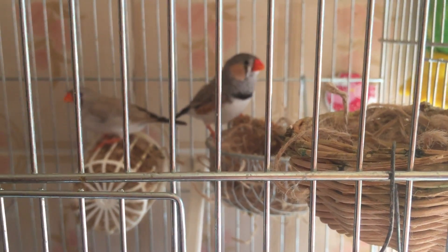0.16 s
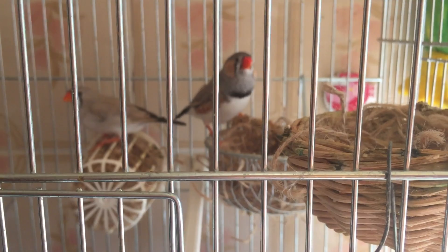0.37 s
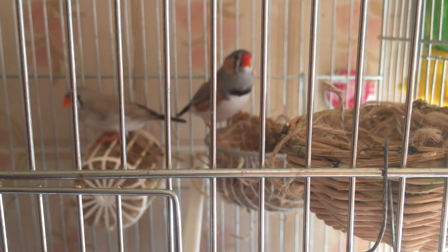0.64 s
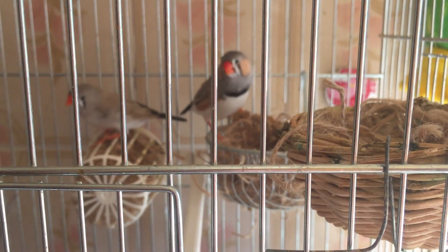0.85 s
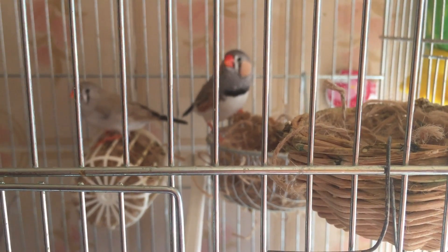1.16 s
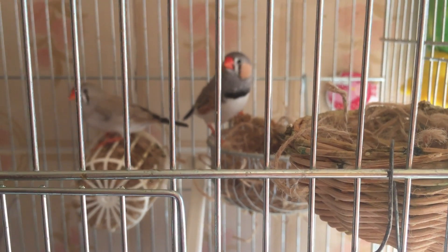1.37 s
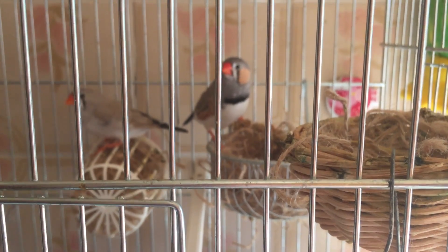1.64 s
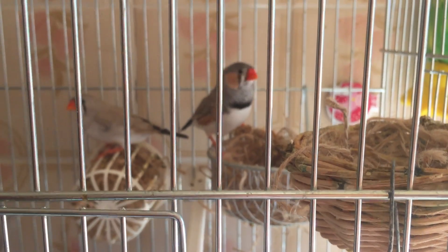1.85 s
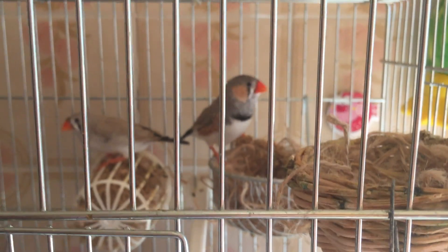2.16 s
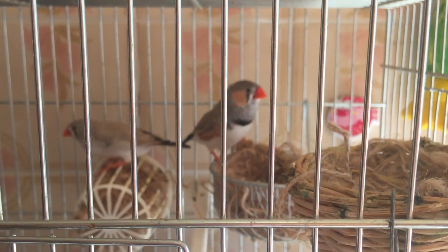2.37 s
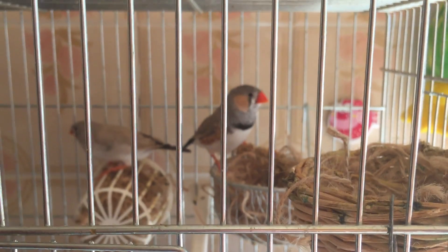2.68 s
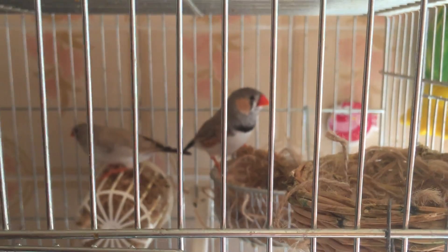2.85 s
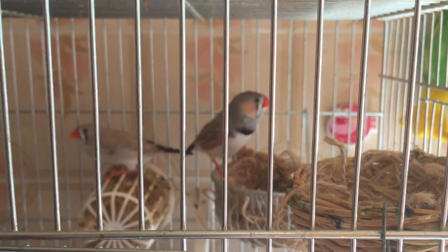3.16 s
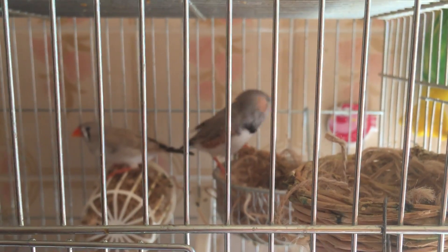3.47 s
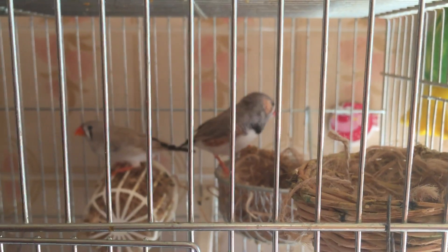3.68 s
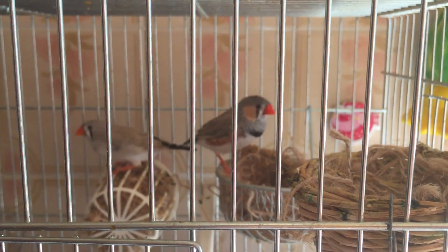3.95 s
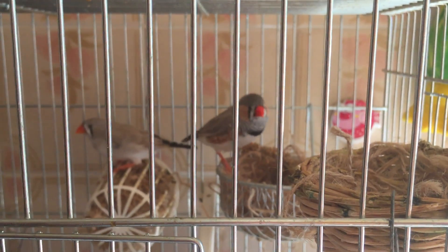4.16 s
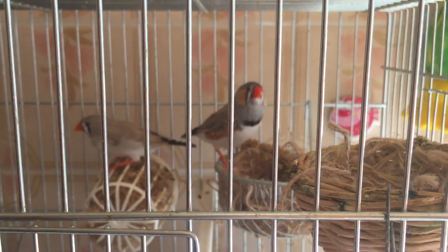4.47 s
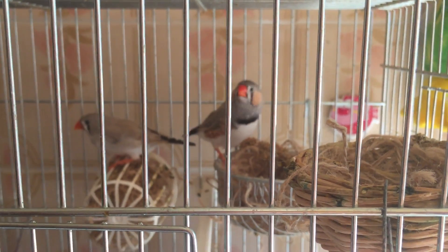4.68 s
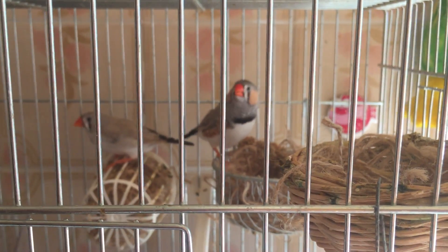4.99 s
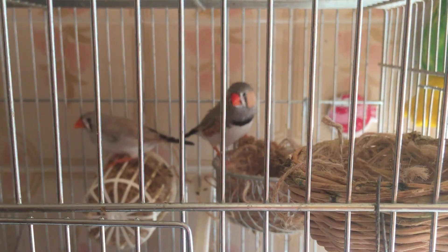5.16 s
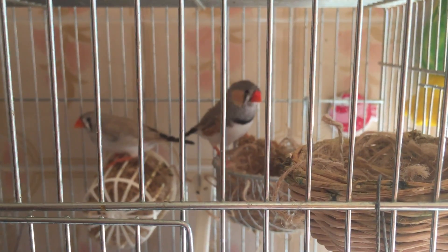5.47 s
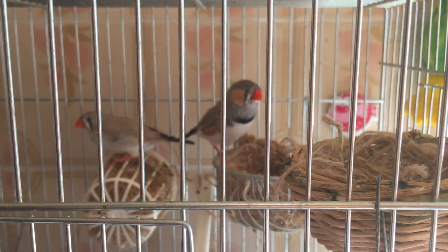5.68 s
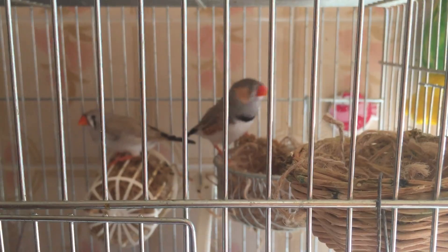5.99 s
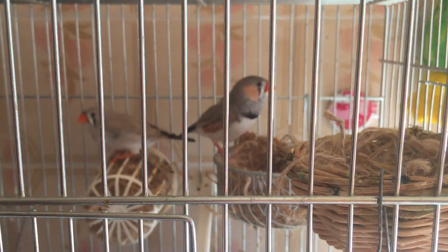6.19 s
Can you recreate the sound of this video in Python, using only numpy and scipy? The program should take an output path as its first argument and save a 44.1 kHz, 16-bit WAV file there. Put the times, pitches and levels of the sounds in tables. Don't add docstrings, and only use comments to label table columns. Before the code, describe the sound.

Close finch song indoors: quick raspy notes, tiny clicks and nasal beeps, two loud falling calls, light cage ticks, low hum.

```python
import sys
import numpy as np
from scipy import signal
from scipy.fft import rfft, irfft
from scipy.io import wavfile
from scipy.ndimage import uniform_filter1d

SR = 44100
rng = np.random.default_rng(int(sys.argv[2]) if len(sys.argv) > 2 else 0)


def generate_wav(sig):
    pcm = np.round(np.clip(np.atleast_2d(sig).T, -1, 1) * 32767).astype(np.int16)
    wavfile.write(sys.argv[1], SR, pcm)


def gain_from_db(level_db):
    decades = np.asarray(level_db, float) / 20
    return 10 ** decades


N = 279153


def band(x, hz, width_hz):
    edges = np.clip([hz - width_hz / 2, hz + width_hz / 2], 20, .48 * SR)
    return signal.sosfilt(signal.butter(2, edges, "bandpass", fs=SR, output="sos"), x)


def unit(x):
    return x / np.sqrt(np.mean(x ** 2))


def add(track, s, x):
    i = int(round(s * SR))
    a, b = max(i, 0), min(i + len(x), N)
    track[a:b] += x[a - i:b - i]


# (frequency [Hz], density [dB per Hz])
AIR = [(15, -61.5), (25, -4), (84, -10), (190, -10), (223, -10), (293, -6), (405, -14), (451, -19),
       (641, -17), (796, -22.5), (1480, -17.5), (1610, -23.5), (2110, -19.5), (2990, -26.5), (16000, -38)]


def air():
    f = np.fft.rfftfreq(N, 1 / SR)
    hz, db = np.transpose(AIR)
    gain = gain_from_db(np.interp(np.log(f + 1), np.log(hz), db))
    return gain_from_db(-63) * unit(irfft(rfft(rng.standard_normal(N)) * gain, N))


# (frequency [Hz], level [dB])
HUM = [(100, -88.5), (200, -74.5), (300, -67), (400, -89.5)]


def mains_hum():
    t = np.arange(N) / SR
    out = np.zeros(N)
    for hz, db in HUM:
        waver_db = 1.5 * unit(uniform_filter1d(rng.standard_normal(N), SR // 12))
        out += gain_from_db(db + waver_db) * np.sin(2 * np.pi * hz * t)
    return out


BODY = {"low": (119, 31, -73), "mid": (188.3, 50, -70.5), "knock": (323, 130, -79.5)}
GRIPS = {"low": [(.68, 0.34, -56), (1.12, .42, -61.5), (1.95, 0.47, -64), (2.6, .2, -67), (4.9, 0.18, -69),
         (6.05, 0.27, -71)], "mid": [(.28, 0.14, -65), (.6, 0.18, -68), (.95, 0.11, -61), (4.87, .2, -64.5),
         (5.47, .17, -59), (6.03, 0.2, -61.5)], "knock": [(.24, .08, -62), (.42, .15, -64.5),
         (1.05, .25, -64), (.72, .15, -58.5), (1.85, .3, -65), (2.98, .12, -64), (4.87, .2, -68),
         (5.46, 0.15, -65.5)]}


def hands():
    t = np.arange(N) / SR
    out = np.zeros(N)
    for part, (hz, width_hz, rest_db) in BODY.items():
        swell = sum(gain_from_db(db) * np.exp(-(2 * (t - s) / length_s) ** 4) for s, length_s, db in GRIPS[part])
        out += (gain_from_db(rest_db) + swell) * unit(band(rng.standard_normal(N), hz, width_hz))
    return out


THROATS = { "rise": [(610, 300, -13), (1240, 350, -1), (2700, 810, -5.5), (4130, 2600, -4.5),
           (6300, 670, -19.5), (9200, 1500, -26)], "flat": [(630, 300, -13.5), (1280, 430, -2.5),
           (2570, 540, -2.5), (3730, 960, -3.5), (5000, 720, -5), (7450, 3900, -20.5)],
           "whistle": [(1816, 850, 0.6), (3590, 760, -5), (5110, 870, -1)], "buzz": [(580, 300, -7),
           (1400, 1400, -12.5), (3300, 1270, -4), (4650, 4300, -7), (7000, 730, -15.5),
           (9500, 3100, -20.5)], "high": [(2977, 1150, -3.5), (5210, 700, 1.5), (8200, 1520, -24),
           (11200, 1900, -28)], "soft": [(940, 1230, -4.5), (2194, 900, -1), (3160, 1250, -7),
           (6500, 2800, -11.5), (9060, 1940, -15)], "blip": [(3370, 810, -11), (7100, 1600, -35)],
           "rasp": [(566, 300, -15.5), (1270, 450, -3), (3240, 660, -1), (4450, 1030, -3.5),
           (5840, 700, -7.5), (9200, 2500, -23)]}
CALL_THROATS = { "lead": [(1000, 900, -4), (2150, 900, -1), (3300, 1250, -7), (6500, 2000, -10),
                (9060, 1940, -16)], "tet": [(1190, 680, -8.5), (2520, 3200, 0.5), (3900, 580, -20),
                (6690, 1900, -9), (9500, 3800, -11)], "call": [(1850, 1400, -10.5), (3065, 610, 2),
                (3980, 1200, 1.5), (5800, 1800, -18.5), (10000, 2900, -17)], "mate": [(3200, 800, 1),
                (4130, 800, -6.5), (2100, 650, -13.5)], "chat": [(890, 240, -13), (2000, 1040, 2.5),
                (3400, 1400, -5), (4300, 900, -9), (8500, 2000, -26.5)], "nasal": [(1400, 1100, -11),
                (3070, 1500, 0), (4600, 870, -5.5), (6100, 780, -24), (9400, 2400, -22)],
                "stack": [(1227, 540, -3.5), (2600, 1700, 1.5), (3950, 1180, 0.4), (6560, 660, -29),
                (9150, 1070, -19.5)]}


def resonances(kind):
    low_cut_hz = 483
    f = 10 * np.arange(1, 2401)
    throat = {**THROATS, **CALL_THROATS}[kind]
    ring = [gain_from_db(db) / (1 + 2j * (f - hz) / width_hz) ** 2 for hz, width_hz, db in throat]
    size = np.sqrt(sum(abs(r) ** 2 for r in ring)) / (1 + (low_cut_hz / f) ** 4)
    lag = np.angle(sum(r * (-1) ** k for k, r in enumerate(ring)))
    return np.array([size, lag])


def unsteady():
    flutter_hz = 750
    noise = rng.standard_normal((4, SR // 5))
    wobble = unit(band(noise[0], 160, 280))
    flutter = unit(band(noise[1:3], flutter_hz / 2 + 30, flutter_hz))
    breath = unit(band(noise[3], 90, 120))
    return np.array([wobble, *flutter, breath])


def wire(x):
    near_echo_db = -15
    lags, signs = rng.integers(8, 90, 4), rng.choice([-1, 1], 4)
    echoes = sum(sign * np.r_[np.zeros(k), x[:-k]] for k, sign in zip(lags, signs))
    return x + gain_from_db(near_echo_db) * echoes


ROUGH = {"rise": (.05, .04, .06), "flat": (.04, .03, .05), "whistle": (.03, .02, .02),
         "buzz": (.65, .4, .25), "high": (.004, .004, .004), "soft": (.07, .08, .12),
         "blip": (.05, .05, .05), "rasp": (.45, .22, .14), "lead": (.07, .08, .12), "tet": (.04, .04, .2),
         "call": (.16, .22, .25), "mate": (.01, .01, .01), "stack": (.08, .05, .09),
         "chat": (.03, .08, .22), "nasal": (.06, .1, .2)}
ODD_DB = {"rasp": -6, "rise": -3, "flat": -3}
HALF_PITCH = {"call": .24, "nasal": .3, "chat": .2, "buzz": .5}
BREAK_DB = {"call": 2, "stack": 1, "whistle": 1.8, "buzz": 2, "soft": 2, "lead": 2, "rasp": 1.5, "chat": .7,
            "nasal": .7}


def syrinx(hz, db, kind, treble_db, beak):
    jitter, rough_tilt, edge_s = .003, 1.1, .0012
    flutter_lag, pulse_spread = 25, .35
    n = len(hz)
    chance = unsteady()
    wobble, breath = chance[[0, 3], :n]
    phase = 2 * np.pi * np.cumsum(hz * (1 + jitter * wobble)) / SR
    order = np.arange(1, int(16000 / hz.min()) + 1)[:, None]
    f = order * hz
    size, lag = resonances(kind)[:, np.minimum(f / beak / 10, 2399).astype(int)]
    tilt_db = treble_db * np.log2(f / 3000) + ODD_DB.get(kind, 0) * (order % 2)
    gain = size * gain_from_db(tilt_db) * (f < 16200)

    rough = np.interp(np.linspace(0, 2, n), [0, 1, 2], ROUGH[kind])
    share = rough * (f / 3000) ** rough_tilt * (1.03 - 1 / order) ** 2 * 1.2
    share = np.clip(share, 0, .95)
    swell, slip = chance[1:3, (np.arange(n) + flutter_lag * order) % chance.shape[1]]
    drift = pulse_spread * np.cumsum(rng.standard_normal(80))[:len(order), None]
    angle = ((order * phase + lag + drift) % (2 * np.pi)).astype(np.float32)
    cos, sin = np.cos(angle), np.sin(angle)
    noise = (swell * cos + slip * sin) * np.sqrt(share / 2)
    tone = np.sum(gain * (np.sqrt(1 - share) * cos + noise), axis=0)

    alternation = HALF_PITCH.get(kind, 0) * np.linspace(1, .3, n) ** 2
    tone = tone + alternation * band(np.cos(phase / 2) * tone, 5000, 6400)
    count = np.arange(n)
    edge = np.clip(np.minimum(count, count[::-1]) / (edge_s * SR), 0, 1)
    breath_db = BREAK_DB.get(kind, .5) * np.clip(breath, -2, 1)
    return gain_from_db(db + breath_db) * edge * wire(unit(tone))


SHAPES = { "rise": [(0, .88, -12.5), (.12, 0.96, -5), (.55, 1, -0.5), (.9, 1.04, -2.5), (1, 1.04, -8)],
          "flat": [(0, 0.94, -7), (.12, .995, -2.5), (.5, 1.005, -1.5), (.9, .995, 0.5), (1, 1.13, -22)],
          "whistle": [(0, 1, -18), (.08, 0.97, 7), (.4, 0.99, 0), (.8, 0.91, -8), (1, 0.66, -22)],
          "buzz": [(0, .96, -18), (.09, 1.04, 0), (.28, .97, 4), (.4, .7, -5.5), (.6, .48, -21),
          (.93, 0.39, -15.5), (1, 0.42, -34)], "high": [(0, 1, -12), (.06, 1.05, -2.5), (.2, 1, 6.5),
          (.9, .985, -5), (1, 1.05, -28)], "blip": [(0, 1.25, -5), (.55, 0.95, 3.5), (.85, 1.07, -1),
          (1, 1.4, -31.5)], "rasp": [(0, 1.6, -6), (.08, 1.06, 1), (.3, 1.03, -3.5), (.5, .99, -1),
          (.72, .96, -4.5), (1, .8, -22)]}
CALL_SHAPES = { "soft": [(0, 1.75, -7), (.2, 1.45, -3), (.45, 1.13, 3.5), (.7, .97, -1), (.9, .9, -3),
               (1, 0.72, -40.5)], "lead": [(0, 1.45, -6), (.2, 1.32, -4), (.45, 1.13, 2), (.7, .99, 0),
               (.9, .93, -4), (1, .85, -30)], "tet": [(0, 1.06, -16), (.25, 1.02, 0), (.55, 1, 6),
               (.75, .93, 2.5), (.95, .78, -3), (1, 1, -13)], "call": [(0, .96, -22), (.05, .99, 3.5),
               (.12, 1.005, 5), (.24, .945, 0.6), (.34, .79, 1), (.48, .54, -1.5), (.7, .37, -5.5),
               (.93, 0.285, -10), (1, 0.259, -26)], "mate": [(0, 1.5, -16), (.25, .98, -5.5), (.5, 0.99, 0),
               (.9, 1, -7), (1, .99, -19)]}
MOTIF = {"soft": (.031, .053, 477, -43.5, .9), "blip": (.152, .01, 3400, -35.5, 1),
         "rasp": (.163, .056, 629, -28.7, 1.1)}
# (high note time [s], effort [dB], head turn treble [dB per octave], beak opening [ratio])
ROUNDS = [
    (.081, 0.4, -0.5, 1.006),
    (0.856, 0.7, 0, 1.004),
    (2.191, -0.1, 0.2, .97),
    (5.232, 0.1, -0.3, 1.028),
    (6.005, -.4, 0, .99),
]
FREE = { "rise": [(.726, .027, 623, -30.5, -.4), (2.059, .029, 645, -32, 0.7), (5.098, .025, 620, -31, .7)],
        "flat": [(5.876, .03, 633.5, -31.5, -.3)], "whistle": [(-.01, 0.055, 1755, -28.5, -2),
        (.764, 0.044, 1785, -34.5, 2), (2.098, 0.054, 1800, -35, 2), (5.141, .065, 1818, -33.5, 0.5),
        (5.917, 0.056, 1820, -36, 1.5)], "buzz": [(-.01, .073, 1430, -28, -1.2),
        (.765, .073, 1430, -28, -1.2), (2.099, .073, 1330, -28.5, -1), (5.141, .073, 1400, -28, -1.2),
        (5.914, .073, 1450, -28.5, -1.2)], "high": [(.081, 0.019, 2730, -28.5, -0.2),
        (.857, 0.013, 2700, -28, 1), (2.191, 0.028, 2812, -28, 1.7), (5.232, .019, 2786, -29.5, 3),
        (6.005, 0.018, 2713, -27, 2)]}
BETWEEN = { "soft": [(.628, 0.062, 483, -42.5, 0), (1.953, 0.049, 472.4, -43.5, 0.2)],
           "lead": [(1.831, 0.049, 474, -42, 1.3), (4.992, .055, 474.4, -45.5, -0.7),
           (5.77, .052, 489, -44.5, -1)], "tet": [(1.678, .035, 524.3, -35.5, 0.7),
           (3.088, 0.044, 520.3, -37, 1.4), (4.256, .042, 530.4, -36.5, 2)],
           "call": [(3.495, .114, 2010, -20, -0.65), (4.583, .12, 1945, -20.5, -.7)],
           "mate": [(2.232, .068, 1072, -40.5, .6)]}


def finch():
    sung = []
    for table in (FREE, BETWEEN):
        for kind, rows in table.items():
            sung += [(kind, *row, 1) for row in rows]
    for s, effort_db, turn_db, beak in ROUNDS:
        for kind, (late_s, length_s, hz, db, treble_db) in MOTIF.items():
            sung.append((kind, s + late_s, length_s, hz, db + effort_db, treble_db + turn_db, beak))

    out = np.zeros(N)
    for kind, s, length_s, hz, db, treble_db, beak in sung:
        share, *columns = np.transpose({**SHAPES, **CALL_SHAPES}[kind])
        along = np.linspace(0, 1, int(length_s * SR))
        ratio, shape_db = (np.interp(along, share, c) for c in columns)
        add(out, s, syrinx(hz * ratio, db + shape_db, kind, treble_db, beak))
    return out


# (time after high note [s], level [dB], half length [s])
MOTIF_CLICKS = [
    (.134, -27.5, 0.0032),
    (0.1426, -24.5, .0022),
]


def tongue_clicks():
    click_hz = 3770
    out, t = np.zeros(N), np.arange(SR // 8) / SR
    for s, effort_db, *_ in ROUNDS:
        for late_s, db, half_s in MOTIF_CLICKS:
            grains = rng.standard_normal(len(t)) * gain_from_db(2.2 * rng.exponential(size=len(t)))
            burst = unit(grains) * np.exp(-((t - 1.02 * half_s) / half_s) ** 2)
            click = band(band(burst, click_hz, 1.65 * click_hz), click_hz, 1.68 * click_hz)
            add(out, s + late_s, gain_from_db(db + effort_db - 3) * click)
    return out


STACKS = { "stack": [(.377, 0.15, 405.5, 464.7, .62), (1.148, 0.14, 410.5, 459.8, 0.3),
          (2.485, 0.14, 402.8, 468.9, 0.58), (5.524, 0.14, 398, 454, .93), (6.297, 0.13, 415, 453, 0.49)]}
STACK_PITCH = {"stack": (.034, .007, .09), "chat": (0.078, 0.0053, .06)}
STACK_LEVEL = {"stack": (-33.2, -7, 0.02, 3.5, 1.1), "chat": (-37.5, -13, 0.02, 1.5, 0)}


def stacks(table):
    overshoot_s, release_s, release_db = .005, .018, -11
    droop, beak_climb = .025, .06
    out = np.zeros(N)
    for kind, rows in table.items():
        step_s, width_s, overshoot = STACK_PITCH[kind]
        db, swell_db, swell_s, climb_db, treble_db = STACK_LEVEL[kind]
        for s, length_s, low_hz, high_hz, share in rows:
            t = np.arange(int(length_s * SR)) / SR
            climb = share / (1 + np.exp((step_s - t) / width_s)) + (1 - share) * t / length_s
            ending = np.clip(1 - (length_s - t) / release_s, 0, 1)
            hz = low_hz * (1 + overshoot * np.exp(-t / overshoot_s)) + (high_hz - low_hz) * climb
            hz = hz * (1 - droop * ending)
            shape_db = swell_db * np.exp(-t / swell_s) + climb_db * (climb - .5) + release_db * ending
            beak = 1 + beak_climb * (climb - .5)
            add(out, s, syrinx(hz, db + shape_db, kind, treble_db, beak))
    return out


# (time [s], level [dB], centre [Hz], ring [s])
TICKS = [(0.465, -19, 3980, 0.075), (0.4632, -33, 11500, .03), (0.4735, -22, 9800, .014),
         (0.4875, -26, 11500, .015), (0.4975, -29, 9500, .02), (0.5945, -35, 4600, 0.042),
         (0.6009, -36, 13500, .016), (0.6095, -37, 10400, 0.036), (0.6463, -39, 8000, .045),
         (0.7013, -43, 2340, 0.014), (1.8936, -34.5, 5840, 0.042), (1.9304, -34, 9450, 0.012),
         (1.938, -25.5, 12800, 0.023), (1.9434, -30, 9860, 0.02), (1.9624, -31, 11200, 0.039),
         (4.35, -41, 11000, .035), (4.5256, -42.5, 11900, 0.019), (4.7481, -31.5, 4430, 0.029),
         (4.7945, -29, 4870, 0.02), (5.0729, -46, 4090, 0.026), (6.322, -29, 10900, 0.024)]


def cage_ticks():
    swell_per_s = 1.8
    out, t = np.zeros(N), np.arange(SR // 8) / SR
    for s, db, hz, ring_s in TICKS:
        rise = np.minimum(t / (swell_per_s * ring_s ** 2), 1)
        burst = rng.standard_normal(len(t)) * gain_from_db(-60 * t / max(ring_s, .002)) * rise
        add(out, s, gain_from_db(db + 1) * (band(burst, hz, 0.16 * hz) + 0.55 * band(burst, 8000, 13300)))
    return out


# (loudest time [s], rise [s], fall [s], level [dB])
SCRATCH = [
    (.596, 0.013, .008, -46.5),
    (.64, 0.033, .05, -49),
    (.71, .02, .012, -46),
    (1.978, .025, 0.00404, -44.5),
    (4.798, .02, .004, -56.5),
]


def scratch():
    t = np.arange(N) / SR
    grains = rng.standard_normal(N) * gain_from_db(3.5 * rng.exponential(size=N))
    loud = np.zeros(N)
    for s, rise_s, fall_s, db in SCRATCH:
        loud += gain_from_db(db) * np.exp(-((t - s) / np.where(t < s, rise_s, fall_s)) ** 2)
    return loud * gain_from_db(-1) * unit(band(grains, 1100, 1600) + 0.22 * band(grains, 6200, 7400))


NEIGHBOUR = {"chat": [(.65, .13, 400, 411, .1)]}


def neighbour():
    return gain_from_db(-10) * band(stacks(NEIGHBOUR), 1050, 800)


WAVERING = {"chat": [(3.232, 438.9, -53, 1.0), (3.24, 436.8, -42, 1.0), (3.256, 419.6, -46, 1.0),
            (3.272, 432.5, -39, 1.0), (3.304, 431.0, -36, 1.0), (3.328, 455.4, -36, 1.0),
            (3.346, 453.7, -36, 1.0), (3.358, 433.5, -36, 1.0), (3.378, 445.6, -44, 1.0)],
            "nasal": [(4.783, 472.7, -43, 1.0), (4.793, 474.6, -33, 1.0), (4.807, 488.8, -29, 1.0),
            (4.821, 476.9, -32, 1.0), (4.843, 491.8, -28, 1.0), (4.863, 491.2, -28, 1.0),
            (4.875, 543.4, -32, 1.0), (4.901, 531.7, -35, 1.0), (4.908, 540.8, -41, 1.0)]}
WAVERING_TREBLE_DB = {"chat": 0.1, "nasal": 0.6}


def wavering():
    out = np.zeros(N)
    for kind, rows in WAVERING.items():
        s, *columns = np.transpose(rows)
        t = np.arange(s[0], s[-1], 1 / SR)
        hz, db, beak = (uniform_filter1d(np.interp(t, s, c), SR // 250) for c in columns)
        add(out, s[0], syrinx(hz, db, kind, WAVERING_TREBLE_DB[kind], beak))
    return out


# (centre [Hz], t60 [s], echo level [dB])
ROOM = [
    (756, 0.45, -14.5),
    (1838, 0.23, -2.5),
    (4050, 0.25, -6),
    (9200, 0.23, -7),
]


def room(x):
    t = np.arange(SR // 2) / SR
    onset = np.clip((t - .003) / 0.0047, 0, 1)
    tail = np.zeros(len(t))
    for hz, t60_s, db in ROOM:
        part = band(rng.standard_normal(len(t)), hz, 1.063 * hz) * gain_from_db(-60 * t / t60_s) * onset
        tail += gain_from_db(db) * part * np.sqrt(2 * np.log(1000) / (t60_s * SR))
    return x + signal.fftconvolve(x, tail)[:N]


def scene():
    background = air() + mains_hum() + hands()
    bird = finch() + tongue_clicks() + stacks(STACKS) + wavering()
    cage = bird + cage_ticks() + scratch()
    cage = signal.sosfilt(signal.butter(4, 420, "highpass", fs=SR, output="sos"), cage)
    return (room(cage) + background + neighbour())[None]


def band_limit(x):
    return signal.sosfilt(signal.butter(12, 16470, fs=SR, output="sos"), x)


def record(dry):
    thin = signal.sosfilt(signal.butter(4, 45, "highpass", fs=SR, output="sos"), dry)
    thin = signal.sosfilt(signal.ellip(8, .3, 60, 15900, fs=SR, output="sos"), thin)
    return band_limit(thin)


dry = scene()
out = record(dry)
generate_wav(out)
```